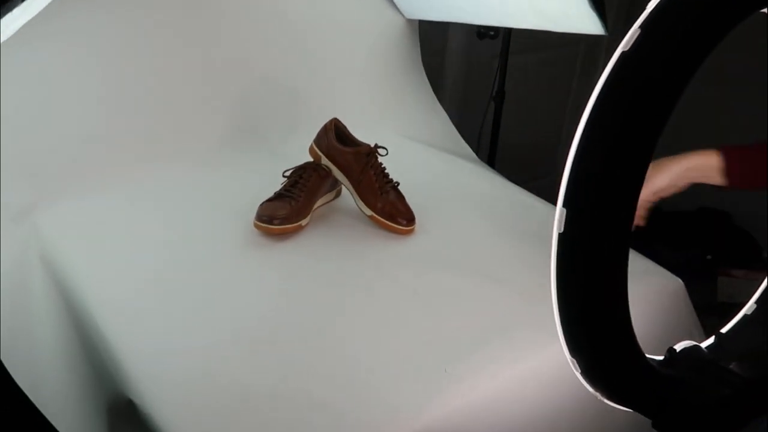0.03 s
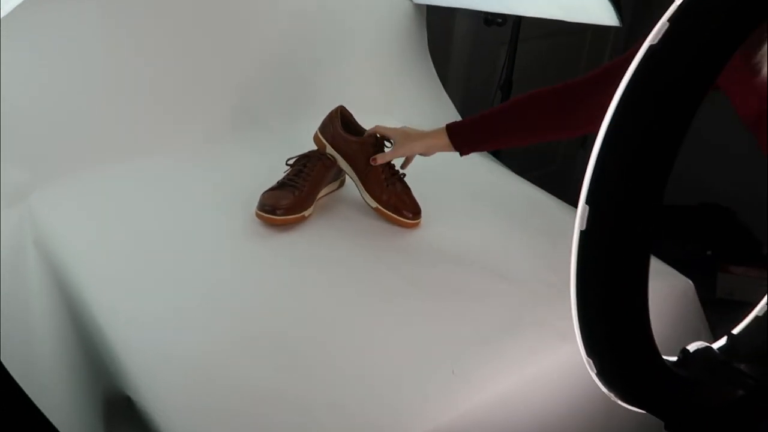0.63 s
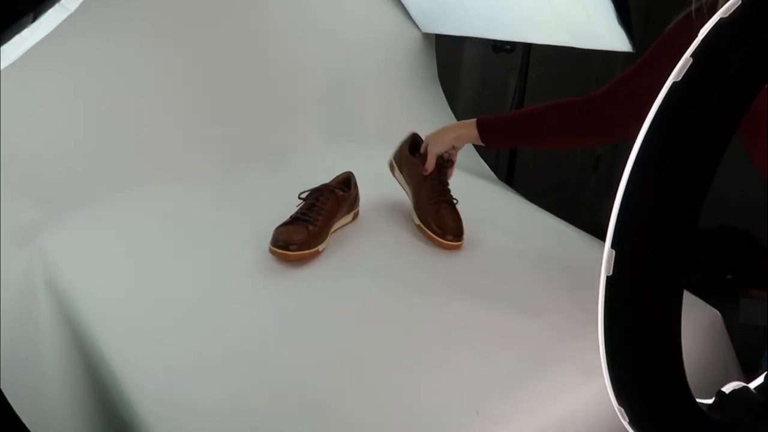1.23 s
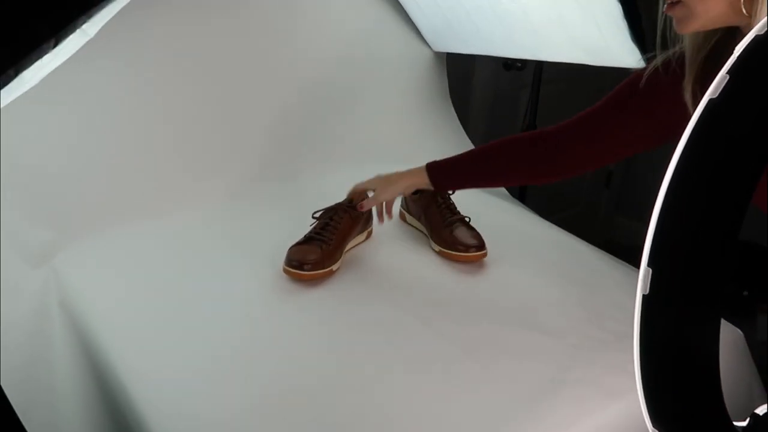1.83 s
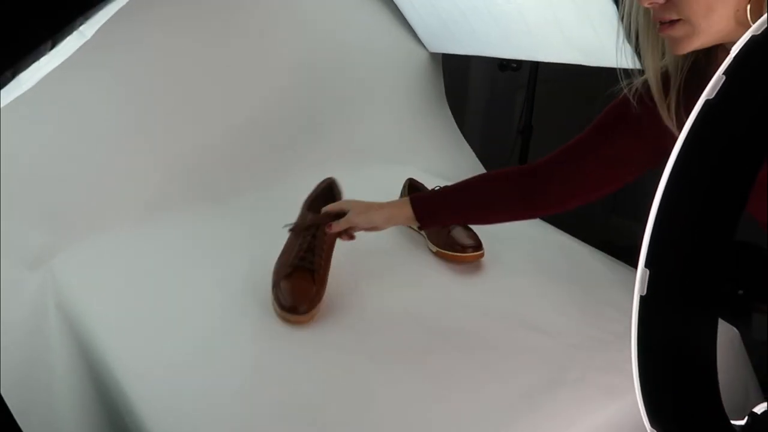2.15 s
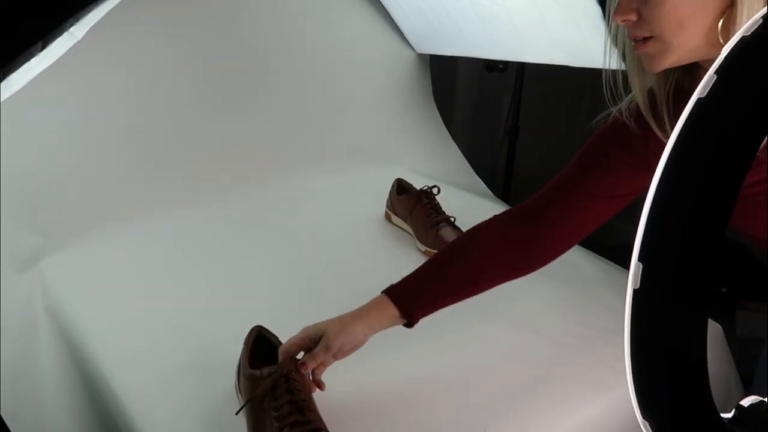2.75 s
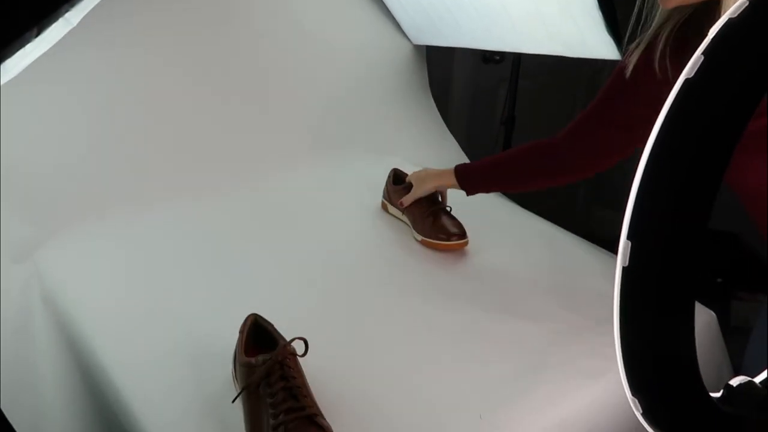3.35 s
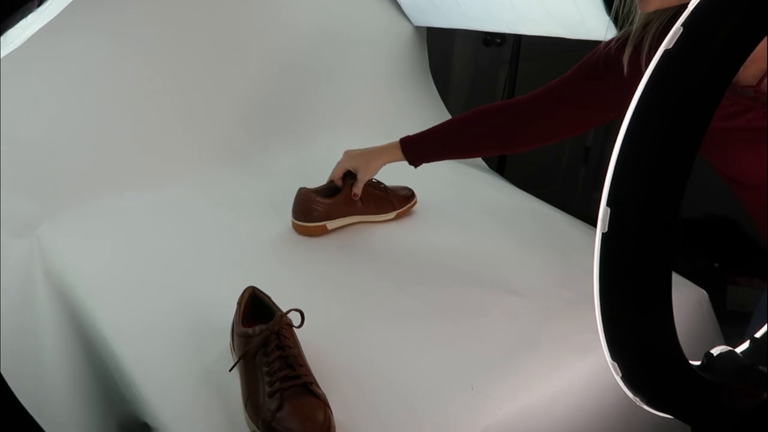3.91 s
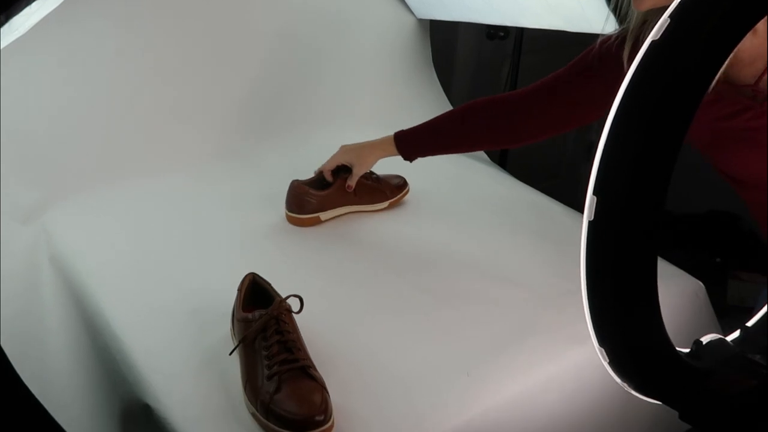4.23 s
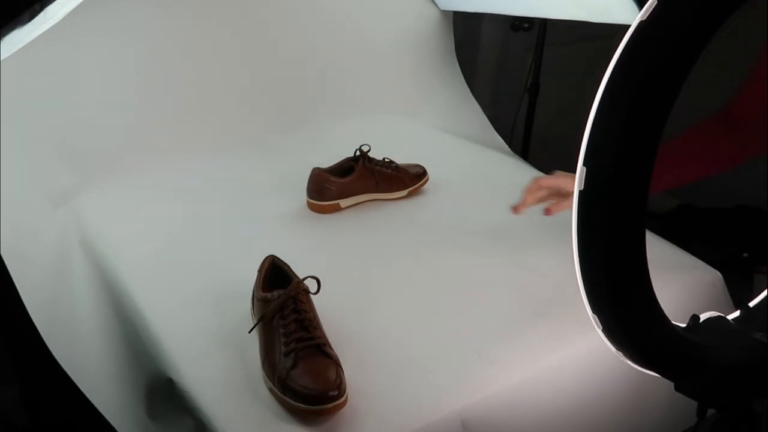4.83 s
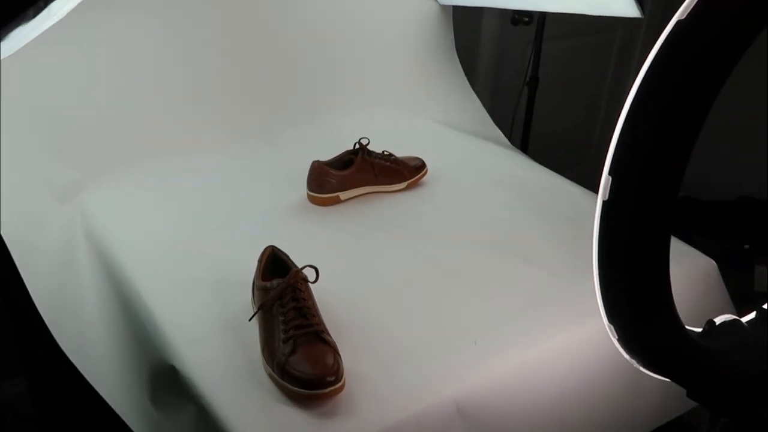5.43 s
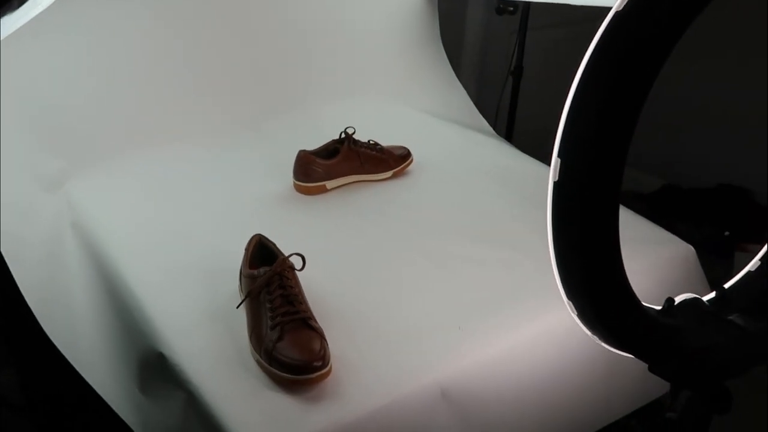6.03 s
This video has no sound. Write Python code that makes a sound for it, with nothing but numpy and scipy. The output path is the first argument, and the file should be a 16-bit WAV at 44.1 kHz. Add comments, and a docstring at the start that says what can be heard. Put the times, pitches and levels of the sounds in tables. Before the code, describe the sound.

Dull thumps and hollow knocks of rubber soles on a papered table, with leather and paper rustling, in a small, quietly humming room.

```python
"""A small room: ventilation hums low and a lamp whines thinly from start to end.
Almost at once a sleeve rustles and two leather shoes are handled on a paper-covered table.
For about four seconds they are lifted, slid and set down. Each rubber sole thumps the table top,
knocks in the hollow shoe and slaps the paper; leather and paper rustle between the blows.
After a pause, near six seconds, the paper ticks twice and one last light knock follows."""
import sys
import numpy as np
from scipy import signal
from scipy.fft import rfft, irfft, next_fast_len
from scipy.io import wavfile
from scipy.ndimage import map_coordinates

SR = 44100
rng = np.random.default_rng(int(sys.argv[2]) if len(sys.argv) > 2 else 0)


def transcribe(signal):
    """Save signal, clipped to [-1, 1], as a 16-bit WAV file at the path in sys.argv[1]."""
    frames = np.atleast_2d(signal).T
    limited = np.clip(frames, -1, 1)
    pcm = np.round(limited * 32767).astype(np.int16)
    wavfile.write(sys.argv[1], SR, pcm)


N = 272097

# Each touch of a sole or hand: t/s, low thump/dB, middle thump/dB, high thump/dB, knock/dB, slap/dB,
# slap's tilt towards the treble/(dB per octave)
CONTACTS = [(0.24, -61, -61, -47, -39, -33, -13.5), (0.836, -28, -37, -53, -45, -52, -5),
            (1.061, -28, -27, -33, -35, -46, 7), (1.099, -26, -24, -38, -37, -54, -3),
            (1.14, -23, -33, -39, -42, -67, 2), (1.256, -12, -28, -29, -36, -39, -1),
            (1.279, -19, -26, -25, -41, -53, -3), (1.372, -19.5, -32, -35, -49, -57, -10),
            (1.636, -27, -32, -49, -46, -59, -3), (1.665, -11, -10, -21, -35, -38, -5),
            (1.681, -10.5, -15, -19, -38, -43, -12), (1.722, -24, -24, -26, -39, -50, -5),
            (1.766, -23.5, -26, -39, -42.5, -55, 0), (2.023, -30, -34, -42, -40.5, -47, 1),
            (2.103, -26, -32, -34, -37, -45, 6), (2.186, -10.5, -12, -31, -25.5, -44, 10),
            (2.203, -30, -28, -38, -37, -50, 12), (2.239, -22, -19.5, -48, -42, -52, -8),
            (2.776, -42, -42, -46, -44, -41, -12), (2.799, -23, -19, -21, -23, -36, -6),
            (2.826, -25, -20, -27, -41, -53, -6), (2.859, -18, -12, -20, -22, -45, -5),
            (2.875, -20, -15, -26, -31, -56, -6), (2.905, -12.5, -24, -27, -38, -58, -6),
            (2.921, -19, -19, -25, -24, -41, -13), (2.955, -24, -22, -25, -32, -53, -10),
            (2.993, -33, -27, -31, -36, -54, -8), (3.05, -28, -30, -37, -47, -62, -8),
            (3.476, -21, -30, -45, -32, -48, -8), (3.5, -22, -35, -49, -43, -56, -5),
            (3.936, -17, -26, -39, -27, -42, 0), (4.014, -32, -47, -47, -40, -56, -3),
            (4.335, -11.5, -16.5, -20, -33, -49, 2), (4.373, -10.5, -20, -23, -32, -55, 5),
            (4.42, -23, -30, -35, -41, -65, 0), (4.485, -28, -35, -46, -50, -65, 0),
            (6.143, -50, -42, -32, -33, -36, -20)]
# The dull tone of rubbed leather: f/Hz, level/dB
LEATHER_COLOUR = [(200, 2.5), (500, 9), (1000, 6.5), (1800, 1), (3000, -15.5), (6000, -49)]
# How alike sounds from the table are on the left and right: f/Hz, likeness (1 = the same)
STEREO_LIKENESS = [(120, .999), (350, .97), (700, .92), (1400, .72), (2800, .55), (5600, .25), (10000, -.1)]


def amp(db):
    """Turn decibels into a factor to multiply by."""
    return 10 ** (np.asarray(db) / 20)


def unit(x):
    """Scale a signal to an average strength (rms) of 1."""
    return x / np.sqrt(np.mean(x ** 2) + 1e-20)


def along(points, hz):
    """Read between (frequency, value) points, with octaves evenly spaced."""
    freqs, values = np.transpose(points)
    return np.interp(np.log(hz + 1), np.log(freqs + 1), values)


def wobble(rate):
    """A smooth curve through `rate` random values a second."""
    return map_coordinates(rng.standard_normal(int(N * rate / SR) + 4), [np.arange(N) * rate / SR])


def swell(start, length, attack, t60):
    """Loudness that rises, holds until `length` is over, then falls 60 dB every `t60` seconds."""
    age = np.arange(N) / SR - start
    return np.clip(age / attack, 0, 1) * amp(-60 * np.maximum(age - length, 0) / t60)


def add(track, s, sound):
    """Mix a sound into the track, starting at `s` seconds."""
    start = round(s * SR)
    part = sound[..., :max(N - start, 0)]
    track[..., start:start + part.shape[-1]] += part


def noise(colour, size, alike=STEREO_LIKENESS):
    """Stereo noise with a given tone colour, alike on both sides in the bass but not in the treble."""
    padded = next_fast_len(size)
    hz = np.fft.rfftfreq(padded, 1 / SR)
    angle = np.arccos(np.clip(along(alike, hz), -1, 1)) / 2
    phases = np.exp(2j * np.pi * rng.random((2, len(hz))))
    spectrum = phases * amp(along(colour, hz)) * [np.cos(angle), np.sin(angle)]
    mid, side = irfft(spectrum, padded)[:, :size]
    return unit(np.array([mid + side, mid - side]))


def burst(colour, t, t60, attack, room_db):
    """A short contact noise from straight ahead, then the room's fading answer."""
    # How long the room rings: f/Hz, time to fall 60 dB/s
    room_decay = [(100, 0.96), (400, 0.33), (1500, 0.24), (5000, 0.13), (12000, 0.22)]
    direct = noise(colour, size=len(t))[0] * amp(-60 * t / t60) * (1 - np.exp(-t / attack))
    hz, age, spectrum = signal.stft(noise(colour, size=len(t)), SR, nperseg=256)
    fading = amp(-60 * age / along(room_decay, hz)[:, None])
    tail = signal.istft(spectrum * fading, SR)[1][:, :len(t)]
    return direct + amp(room_db) * tail * (1 - np.exp(-t / 0.0067))


def ring(modes, t, strength, scatter_db, attack, detune):
    """A struck object's own tones (modes); the spot hit varies their level, the load their pitch."""
    hz, db, t60 = np.transpose(modes)[:, :, None]
    level_luck, pitch_luck = rng.standard_normal((2, len(modes), 1))
    weight = amp(db + scatter_db * level_luck) * strength(hz)
    waves = weight * np.sin(2 * np.pi * hz * (1 + detune * pitch_luck) * t) * amp(-60 * t / t60)
    return waves.sum(0) * (1 - np.exp(-t / attack))


def ventilation(air_db=-45, wavers_per_s=16, steady=2.8):
    """Moving air rushes softly, with a low hum that wavers in its resonances."""
    # The tone of the moving air: f/Hz, level/dB
    air_colour = [(12, -21), (20, -5), (43, -1.5), (72, -18), (108, -4), (170, -12), (302, -11.5),
                  (440, -14.5), (774, -20), (1050, -20.5), (2600, -25), (4820, -30), (13100, -44.5),
                  (15000, -55)]
    # How alike the air is on the left and right: f/Hz, likeness
    air_likeness = [(60, .998), (110, .98), (200, .73), (380, .23), (700, 0), (1500, -.1)]
    # The hum's narrow resonances: f/Hz, level/dB
    hum_tones = [(118.4, -51.5), (150.7, -56.5), (296.1, -58.5)]
    t = np.arange(N) / SR
    out = amp(air_db) * noise(air_colour, size=N, alike=air_likeness)
    for hz, db in hum_tones:
        waver = steady + wobble(wavers_per_s) + 1j * wobble(wavers_per_s)
        out += amp(db) * unit((waver * np.exp(2j * np.pi * hz * t)).real)
    return out


def lamp():
    """A lamp whines with two high tones, so close that they beat against each other."""
    # The lamp's tones: f/Hz, level/dB
    whine_tones = [(13000, -80), (13026, -81)]
    out, t = np.zeros((2, N)), np.arange(N) / SR
    for hz, db in whine_tones:
        phase_drift = 0.4 * np.array([wobble(6), wobble(6)])
        out += amp(db) * unit(np.sin(2 * np.pi * hz * t + phase_drift))
    return out


def near_walls(x, count=8, first_s=0.001964, last_s=0.022, echo_db=-4, above_hz=590):
    """Weak, quick echoes from nearby lamps, backdrop and walls colour everything above the bass."""
    padded = next_fast_len(N + SR // 2)
    hz = np.fft.rfftfreq(padded, 1 / SR)
    delays = rng.uniform(first_s, last_s, (count, 1))
    echoes = np.exp(-2j * np.pi * hz * delays).sum(0) / np.sqrt(count)
    share = amp(echo_db) * hz ** 2 / (hz ** 2 + above_hz ** 2)
    return irfft(rfft(x, padded) * (1 + share * echoes) / np.sqrt(1 + share ** 2), padded)[:, :N]


def sleeve(level_db=-58.5, flutter_db=4.5):
    """Cloth rustles faintly and unevenly, as dull as the leather, while the arm is over the table."""
    cloth = unit(noise(LEATHER_COLOUR, size=N) * amp(flutter_db * wobble(12)))
    return amp(level_db) * swell(start=0.23, length=4.427, attack=0.254, t60=1.2) * cloth


def paper_ticks(ring_hz=3950):
    """The paper gives tiny dry ticks under a sole or as it settles."""
    # The ticks: t/s, level/dB
    ticks = [(2.8, -33), (3.94, -48), (6.023, -39), (6.062, -43)]
    out, t = np.zeros((2, N)), np.arange(SR // 10) / SR
    colour = [(ring_hz / 2, -30), (ring_hz, 0), (ring_hz * np.sqrt(2), -35)]
    for s, db in ticks:
        add(out, s, amp(db) * burst(colour, t, t60=0.015, attack=0.00055, room_db=-39))
    return out


def rustling(flex_leather_db=-21.5, flex_paper_db=-29):
    """Leather rubs and paper slides in tiny grains, under each stroke and as a shoe flexes."""
    # A hand grips a shoe or a sole drags on the paper: t/s, length/s, leather/dB, paper/dB
    strokes = [(0.798, 0.043, -46, -52), (0.914, 0.022, -49, -52), (1.022, 0.043, -43.5, -47.5),
               (1.334, 0.1, -58, -47), (1.893, 0.013, -46, -73.5), (2.04, 0.062, -44, -46.5),
               (2.13, 0.064, -44.5, -48), (2.185, 0.028, -57, -42.5), (2.46, 0.21, -53.5, -55.5),
               (3.063, 0.12, -61, -51), (3.19, 0.1, -56, -53), (3.473, 0.11, -43, -53.5),
               (3.858, 0.023, -43.5, -45.5), (4.208, 0.096, -47.5, -52.5), (4.542, 0.012, -44.5, -65.5),
               (5.844, 0.013, -48.5, -59)]
    # The bright tone of sliding paper: f/Hz, level/dB
    paper_colour = [(1200, 1), (2600, 3), (4000, -2), (6500, -8), (9000, -17), (14000, -24), (16000, -34)]
    moves = [(swell(s, length, attack=0.0095, t60=0.36), leather_db, paper_db)
             for s, length, leather_db, paper_db in strokes]
    for s, *_, knock_db, _, _ in CONTACTS:  # the louder the knock, the louder the flexing after it
        flex = swell(s, length=0.02, attack=0.02, t60=0.66)
        moves.append((flex, knock_db + flex_leather_db, knock_db + flex_paper_db))
    rub = np.sqrt(sum((shape * amp(db)) ** 2 for shape, db, _ in moves))
    slide = np.sqrt(sum((shape * amp(db)) ** 2 for shape, _, db in moves))
    leather = unit(noise(LEATHER_COLOUR, size=N) * amp(1.2 * wobble(150)))
    paper = unit(noise(paper_colour, size=N) * amp(2.5 * wobble(500) + 1.9 * wobble(60)))
    return rub * leather + slide * paper


def chafing():
    """Leather and rubber stick and slip, making a rough tone that glides as the grip shifts; the one bright,
    broad chafe near 1.33 s is paper sliding."""
    # The chafes: t/s, length/s, first f/Hz, last f/Hz, width as a share of the pitch, level/dB
    chafes = [(0.165, 0.1417, 308.9, 310, 0.39, -42), (0.239, 0.12, 570, 550, 0.294, -45.5),
              (0.235, 0.0295, 1067, 980, 0.99, -39.5), (0.808, 0.028, 2850, 2500, 0.37, -52),
              (0.839, 0.032, 1544, 844, 0.35, -42), (1.33, 0.16, 6020, 4780, 0.7, -54.5),
              (2.071, 0.074, 900, 835, 0.42, -37), (3.478, 0.071, 904, 1007, 0.56, -41),
              (3.509, 0.15, 2012, 2073, 0.1, -58), (3.556, 0.11, 442.5, 473, 0.44, -41),
              (3.863, 0.066, 1136, 1070, 0.342, -45.5), (4.223, 0.054, 2600, 2290, 0.45, -51.5),
              (4.357, 0.15, 552, 561, 0.12, -40)]
    out = np.zeros((2, N))
    for s, length, start_hz, end_hz, width, db in chafes:
        size = int(length * SR)
        progress = np.linspace(0, 1, size)
        cycles = np.cumsum(start_hz * (end_hz / start_hz) ** progress) / SR
        # strength and phase change every few cycles
        draws = rng.standard_normal((4, size // 2))
        slips = np.array([map_coordinates(row, [cycles * width]) for row in draws])
        mid, side = (np.exp(2j * np.pi * cycles) * (slips[::2] + 1j * slips[1::2])).real
        spread = np.tan(np.arccos(along(STEREO_LIKENESS, start_hz)) / 2)
        stereo = unit(mid) + spread * unit(side) * np.array([[1], [-1]])
        grip = np.sin(np.pi * np.sqrt(progress))  # bites quickly, lets go slowly
        add(out, s, amp(db) * grip * stereo)
    return out


def paper_slap(t, tilt_db):
    """A sole slaps the paper; a higher tilt makes it crisper."""
    # The tone of the slap before tilting: f/Hz, level/dB
    slap_colour = [(500, -24), (1300, -3), (2300, -0.5), (3800, 3.5), (5000, -5), (10000, -19),
                   (15000, -42)]
    tilted = [(hz, db + tilt_db * np.log2(hz)) for hz, db in slap_colour]
    return burst(tilted, t, t60=0.04, attack=0.00059, room_db=-4)


def shoe_knock(t, hollow_db=-8.5):
    """The rubber sole gives a dull knock and the hollow shoe rings with it."""
    # The hollow shoe's own tones: f/Hz, level/dB, time to fall 60 dB/s
    shoe_modes = [(327, 2.5, 0.23), (363, -0.5, 0.161), (423.2, 1.5, 0.31), (567, -1, 0.1),
                  (731, -11, 0.21)]
    # The tone of knocked rubber: f/Hz, level/dB
    rubber_colour = [(65, -2), (190, 0), (310, 6), (450, 4.5), (700, 0), (1200, -11.5), (2200, -19),
                     (4000, -70)]
    push_or_pull = lambda hz: rng.choice([-1, 1], hz.shape)
    hollow = ring(shoe_modes, t, push_or_pull, scatter_db=3, attack=0.001, detune=0.0088)
    return burst(rubber_colour, t, t60=0.11, attack=0.0004, room_db=-5.5) + amp(hollow_db) * hollow


def table_thump(t, thump_db, gap_s, push_db=-14, push_hz=68, push_t60=0.12, mute_db=5.5, mute_s=0.026):
    """The table gives way and rings until the next contact damps it; the room booms on."""
    # The table top's own tones: f/Hz, level/dB, time to fall 60 dB/s
    table_modes = [(129, 0, 0.22), (152, -4.5, 0.17), (180, 0, 0.21), (206, -10, 0.15), (243, 0, 0.22)]
    # The room's bass tones, set going by the table: f/Hz, level/dB, time to fall 60 dB/s
    room_modes = [(121, -16, 0.7), (150, -15, 0.5), (192, -18, 0.5)]
    # Where the low, middle and high thump lie: f/Hz
    thump_hz = [125, 178, 243]
    # a flat, soft landing favours the low tones, a heel the higher ones
    strength = lambda hz: amp(np.interp(hz, thump_hz, thump_db))
    top = ring(table_modes, t, strength, scatter_db=1, attack=0.003, detune=0.012)
    bass_cut = signal.butter(2, 85, "high", fs=SR, output="sos")  # the top gives off little deep bass
    top = signal.sosfilt(bass_cut, top)
    # the shoe's weight pushes the whole table down
    push = amp(push_db - 60 * t / push_t60) * strength(push_hz) * np.sin(2 * np.pi * push_hz * t)
    boom = ring(room_modes, t, strength, scatter_db=1, attack=0.04, detune=0.012)
    muting = amp(-mute_db * np.clip((t - gap_s) / mute_s, 0, 1))
    return muting * (top + push) + boom


def shoe_blows():
    """Each contact makes a thump, a knock and a slap; a landing is a quick run of contacts."""
    out, t = np.zeros((2, N)), np.arange(SR // 2) / SR
    gaps = np.diff([row[0] for row in CONTACTS], append=N / SR)
    for (s, *thump_db, knock_db, slap_db, tilt_db), gap_s in zip(CONTACTS, gaps):
        add(out, s, table_thump(t, thump_db, gap_s))
        add(out, s, amp(knock_db) * shoe_knock(t))
        add(out, s, amp(slap_db) * paper_slap(t, tilt_db))
    return out


def scene():
    """The shoes on the table, straight ahead, in the quiet room."""
    shoes = shoe_blows() + chafing() + paper_ticks() + rustling() + sleeve()
    return ventilation() + lamp() + near_walls(shoes)


def record(dry):
    """Cut away the very highest treble."""
    top_hz = 15150
    padded = next_fast_len(N + SR // 2)
    passes = np.fft.rfftfreq(padded, 1 / SR) < top_hz
    return irfft(rfft(dry, padded) * passes, padded)[:, :N]


dry = scene()
out = record(dry)
transcribe(out)
```